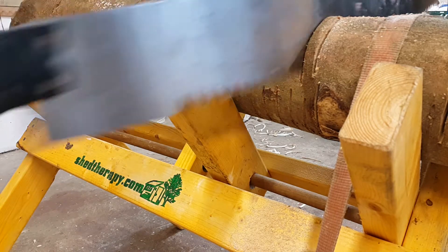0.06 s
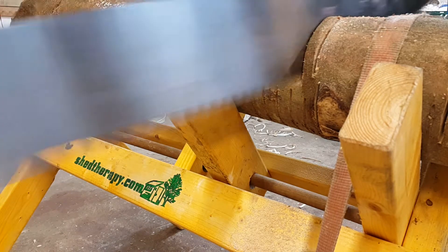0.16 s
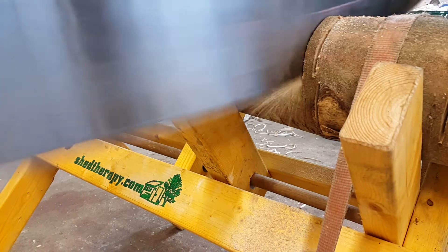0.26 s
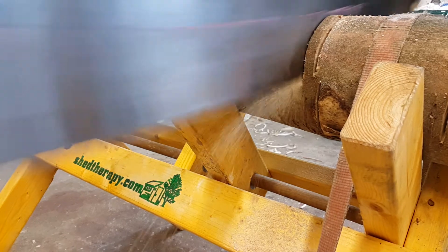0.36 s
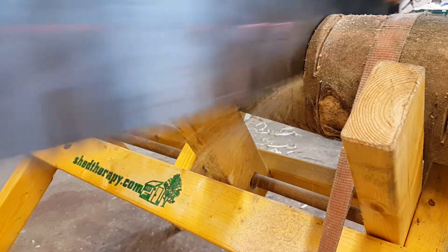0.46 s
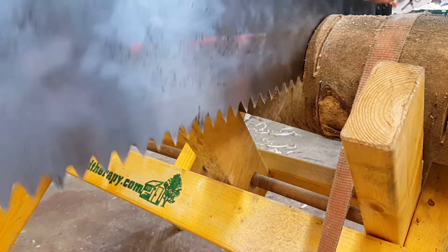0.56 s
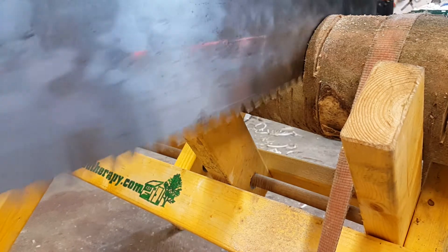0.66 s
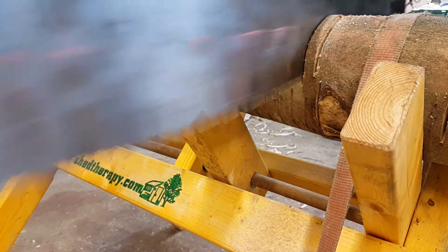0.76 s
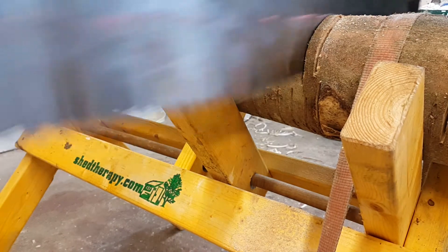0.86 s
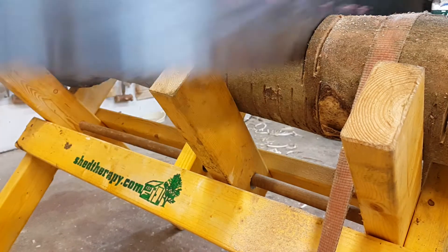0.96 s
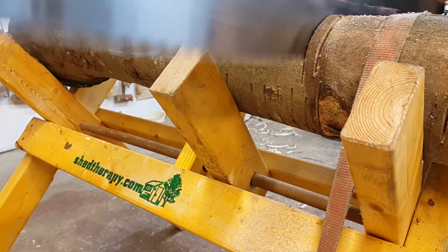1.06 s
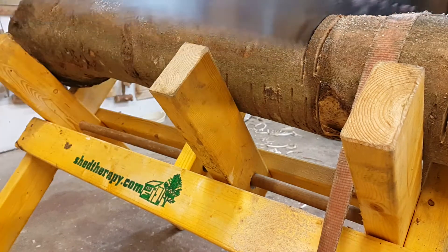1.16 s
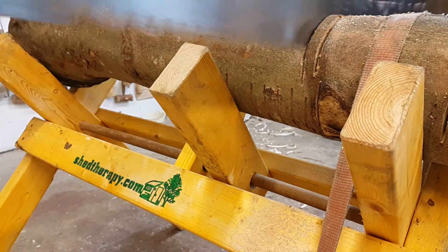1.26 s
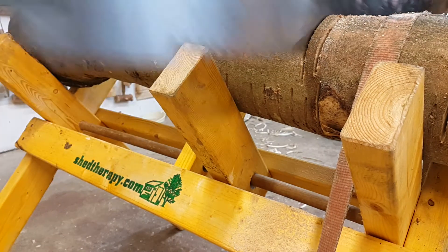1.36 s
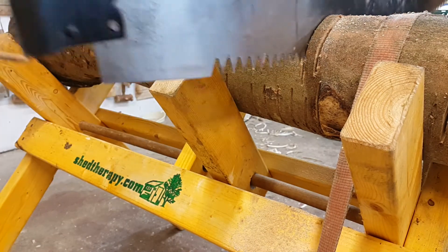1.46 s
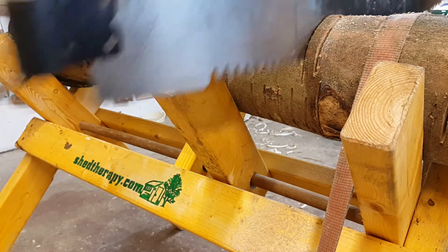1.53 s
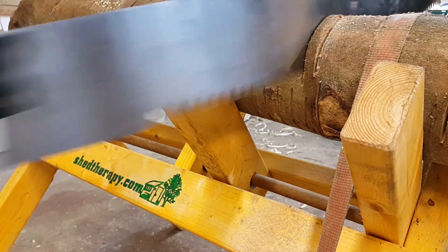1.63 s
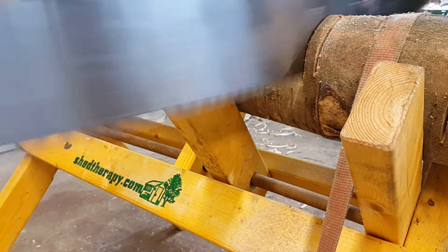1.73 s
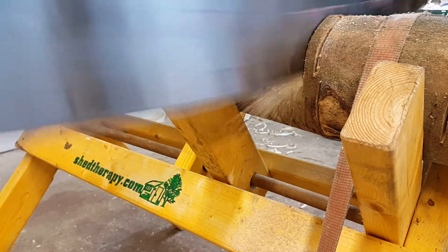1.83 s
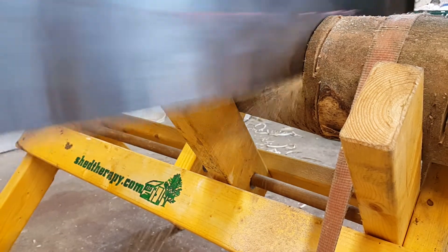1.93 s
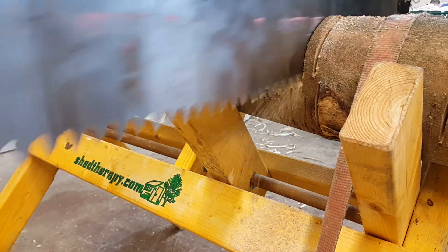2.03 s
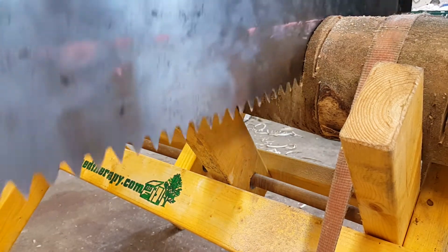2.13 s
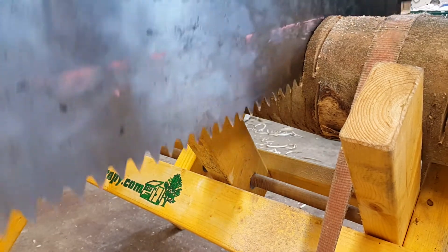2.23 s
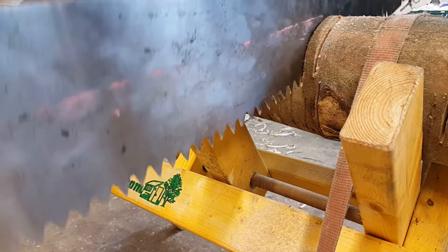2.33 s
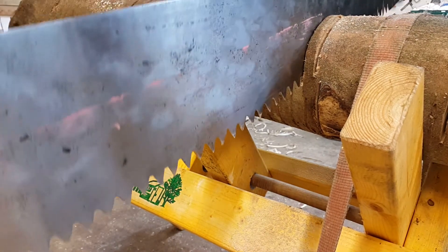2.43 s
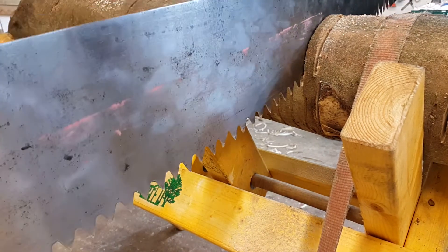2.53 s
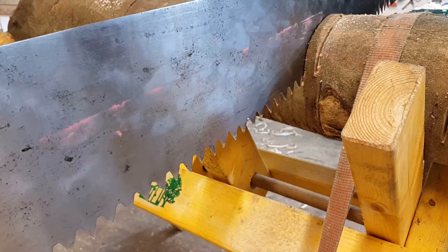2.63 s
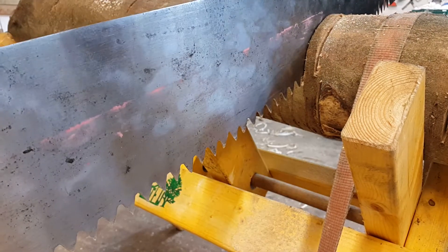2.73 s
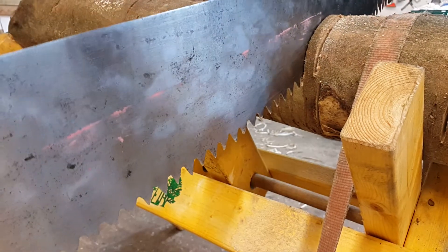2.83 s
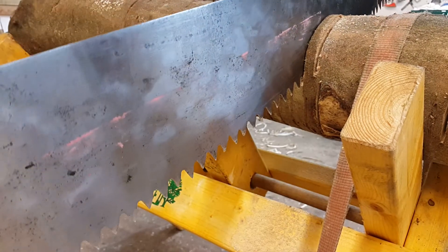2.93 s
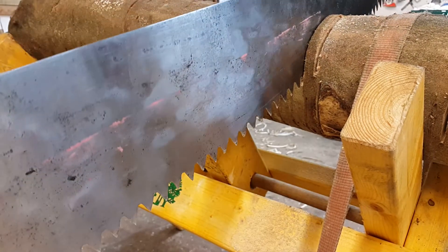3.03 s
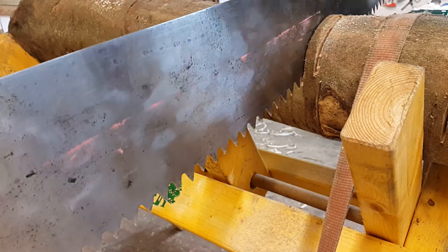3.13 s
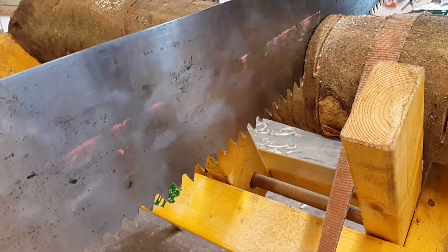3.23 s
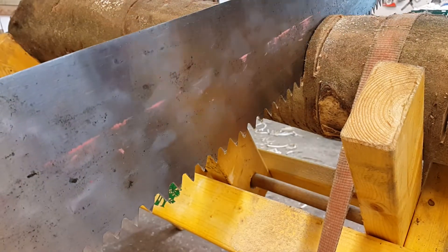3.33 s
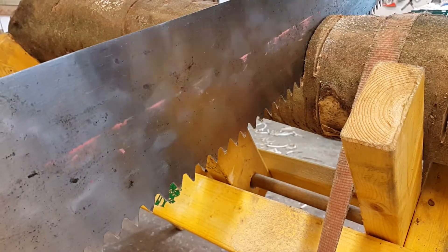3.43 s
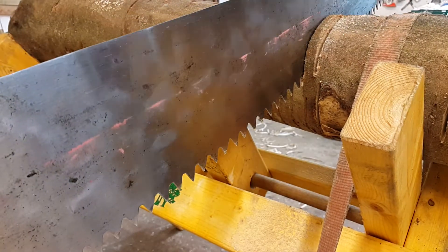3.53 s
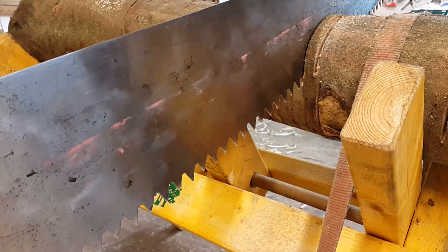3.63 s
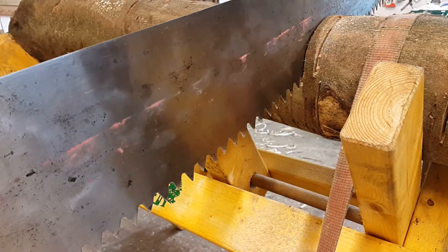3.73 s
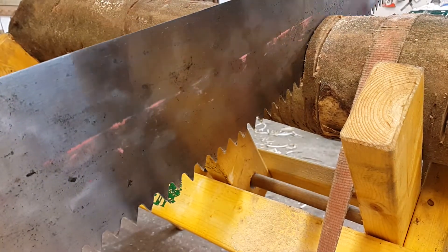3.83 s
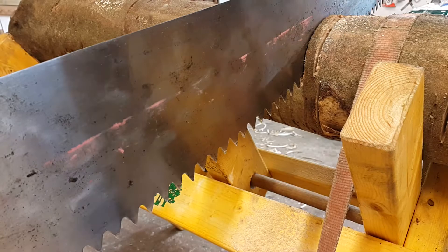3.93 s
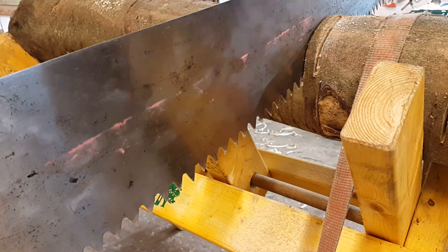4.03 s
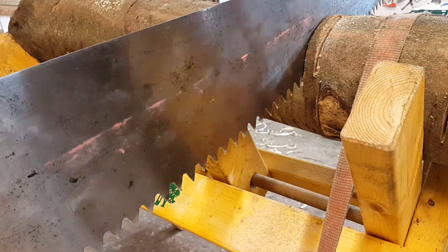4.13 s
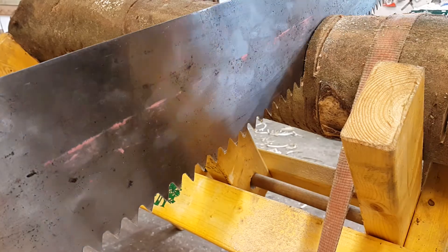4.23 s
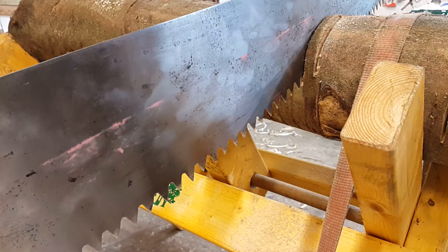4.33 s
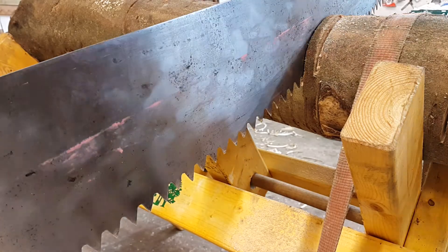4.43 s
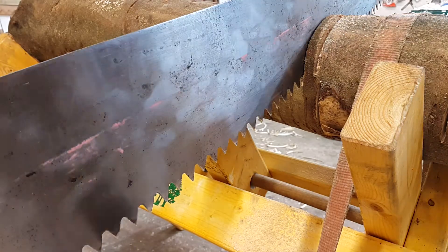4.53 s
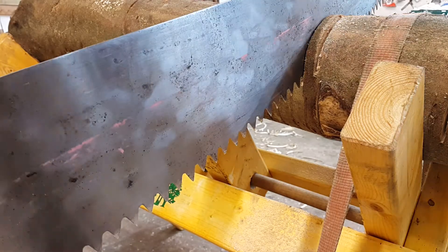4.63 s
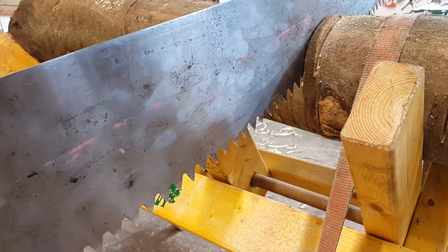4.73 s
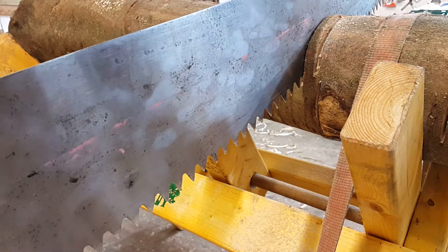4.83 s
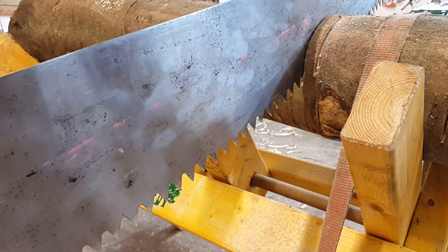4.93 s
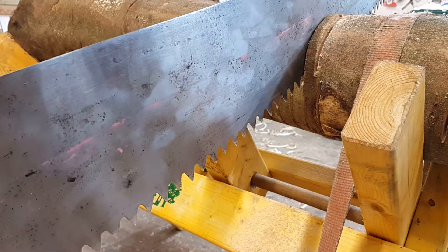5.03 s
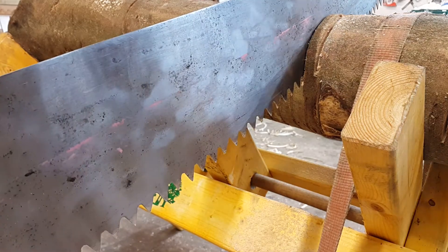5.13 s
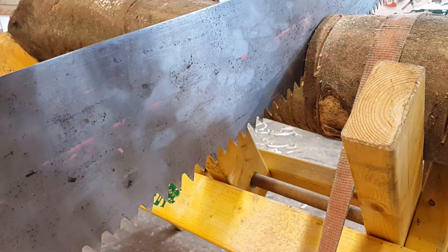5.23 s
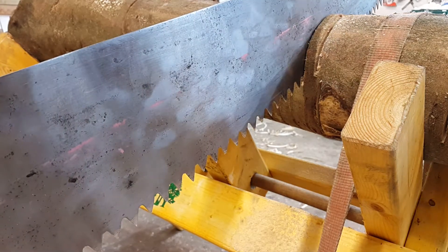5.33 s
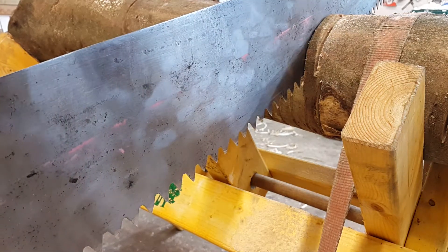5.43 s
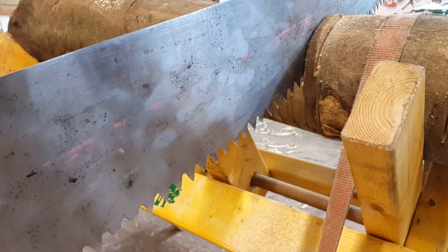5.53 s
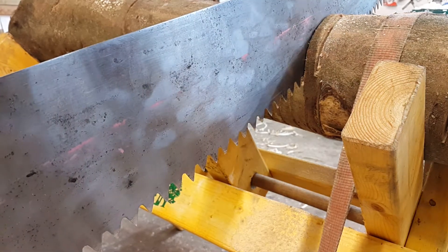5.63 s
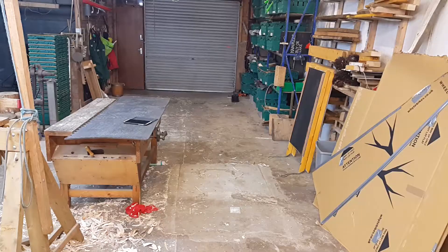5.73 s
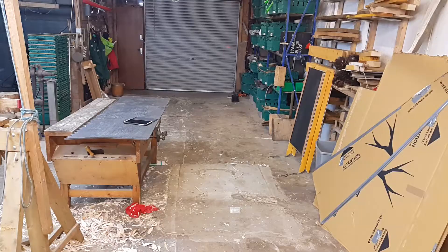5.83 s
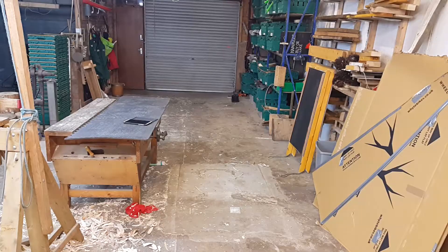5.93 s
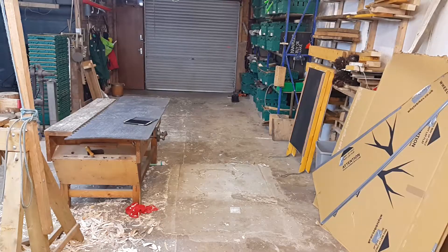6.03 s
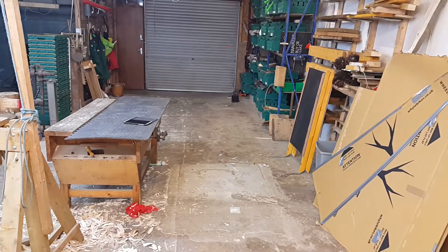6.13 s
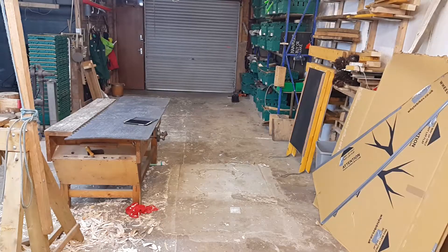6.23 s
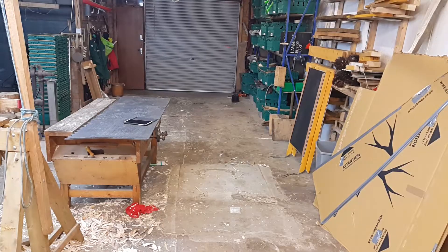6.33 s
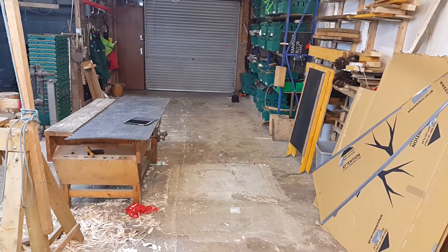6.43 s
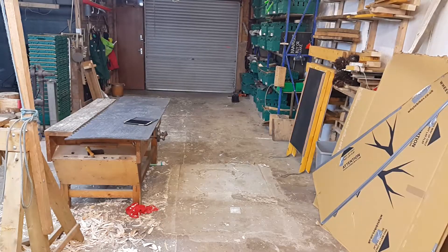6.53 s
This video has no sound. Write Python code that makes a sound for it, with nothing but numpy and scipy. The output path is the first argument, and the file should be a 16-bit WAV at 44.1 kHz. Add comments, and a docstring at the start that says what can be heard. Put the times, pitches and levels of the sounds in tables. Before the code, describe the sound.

Loud sawing opens abruptly in a reverberant workshop: the tail of a pull, a strong push, a rougher pull with stuttering skids, then a harder, faster push. The blade's hum dies away as cutting ends. A few sharp metallic clacks and tiny pings follow, with quieter footsteps and gritty scuffs behind. One small click, then only still air and faint hum. The saw is close to the microphone, the feet more distant.

```python
"""A coarse hand saw, close to the microphones, is pushed, drawn back and pushed again through a log on a
wooden sawhorse in a workshop. Random fibre fractures, timed by tooth and stroke, make the rasp and skids
and drive the ringing blade; the sawhorse knocks. Left in the cut, the saw ticks and pings as it settles.
Further off, the sawyer's heels thud and soles scuff on gritty concrete. One dry click sounds near the end;
behind it all lie still air, room echo and faint hums, some of which fall silent."""
import sys
import numpy as np
from scipy import signal
from scipy.fft import rfft, irfft
from scipy.io import wavfile

SR = 44100
rng = np.random.default_rng(int(sys.argv[2]) if len(sys.argv) > 2 else 0)


def bounce(signal):
    """Save signal as a 16-bit WAV file at the path given by the first command-line argument."""
    frames = np.transpose(np.atleast_2d(signal))
    limited = np.clip(frames, -1, 1)
    pcm = np.round(limited * 32767).astype(np.int16)
    wavfile.write(sys.argv[1], SR, pcm)


N = 290612
TIME = np.arange(N) / SR

# Still air of the workshop, relative spectrum: pitch_hz, level_db per Hz
AIR_SPECTRUM = [(15, -60), (25, -22.5), (101, -10), (169, -17.5), (193, -19), (552, -19.5), (598, -16),
                (666, -23.5), (15500, -37)]
AIR_DB = -67.0
# Steady mains hum: pitch_hz, level_db (rms)
MAINS_TONES = [(100, -77), (199.5, -80.5), (300, -84), (598, -91), (700, -85.5)]
# Lower hum beside the mains, until it falls silent: pitch_hz, level_db (rms)
LOW_HUM_TONES = [(92, -71), (145.3, -75)]
LOW_HUM_ENDS_S = 5.9
# Echo of the workshop: pitch_hz, t60_s
ROOM_DECAY = [(100, 0.94), (260, 0.61), (700, 0.59), (1840, 0.66), (4850, 0.5), (12800, 0.39)]
# Likeness of left and right in sound from all around: pitch_hz, correlation
ROOM_LIKENESS = [(60, 0.25), (150, .9), (300, 0.66), (640, 0.22), (1400, 0.086), (6000, 0.093)]
# Near sounds at the two microphone ports: pitch_hz, left_minus_right_db
PORT_COLOUR = [(300, 1), (1000, -1), (1800, -3), (4000, -1), (5400, -4.5), (6400, -11), (7300, -3),
               (8300, 6.5), (9500, 3), (15000, 1)]
SAW_LAG_S, TICK_LAG_S = .00008, 0.0003114   # later arrival at the left port
CUTOFF_HZ = 16000

# Small dry click, relative spectrum: pitch_hz, level_db per Hz
SNAP_SPECTRUM = [(100, 4.5), (550, -13), (780, 0.5), (1400, -7.5), (3300, -2.5), (3900, -14), (6500, -10),
                 (9000, -39)]
SNAP_S, SNAP_DB = 5.727, -28.5   # start, peak level

# Soles scuff on gritty concrete: loudest_s, level_db, rise_s, fall_s
SOLE_SCUFFS = [(2.524, -44.5, 0.037, 0.032), (3.215, -49.5, 0.026, .038), (3.294, -33, 0.01, 0.0053),
               (3.79, -34.5, .013, 0.0078), (4.358, -52.5, 0.029, 0.054), (4.912, -29, 0.027, .019),
               (5.58, -67.5, 0.038, 0.031)]
# Faint shifting of the feet: start_s, end_s, level_db
FOOT_SHUFFLES = [(2.5, 3.2, -67.5), (3.77, 4.9, -63.5)]
# Crunch of grit, relative spectrum: pitch_hz, level_db per Hz
GRIT_SPECTRUM = [(50, -28), (90, -18), (160, -0.5), (240, -9.5), (340, 1.5), (620, -0.5), (880, -5.5),
                 (1150, 0.5), (1650, -2.5), (2400, -8.5), (4600, -9), (6100, -10), (7700, -26),
                 (11000, -17), (16000, -23)]
# Heel strikes on concrete: start_s, level_db (peak)
HEEL_STRIKES = [(3.771, -25.5), (4.337, -31.5)]
# Modes of the heel thud: pitch_hz, level_db (relative), t60_s
HEEL_MODES = [(110, -29, 0.02), (255, -6.5, 0.019), (480, 4.5, 0.0024)]
TOE_S, TOE_DB = .027, -9   # the toe lands this much later and weaker
# after the heel the sole rolls over the grit: delay to the loudest moment, level, rise, fall
ROLL_S, ROLL_DB, ROLL_RISE_S, ROLL_FALL_S = .13, -54.5, 0.036, 0.11

# The sawhorse rocks on its legs: start_s, level_db
FRAME_KNOCKS = [(0.611, -42), (.797, -33), (1.091, -37.5), (1.277, -38), (1.532, -32), (1.74, -39),
                (2.49, -45.5)]
# Dull sound of the frame, relative spectrum: pitch_hz, level_db per Hz
FRAME_SPECTRUM = [(30, -29.5), (55, -4.5), (100, 0.5), (150, 0.5), (250, -1.5), (400, 2), (900, -33.5),
                  (3000, -61)]
KNOCK_T60_S = .22
JOLT_DB = -19.5   # jolt of the frame at a skid, relative to the skid's level
JUDDER_DB = -47   # judder of the frame at the fastest moment of the pull

# A tooth springs free and pings: start_s, level_db (near peak), pitch_hz, t60_s
TOOTH_PINGS = [(3.9915, -29, 6400, .008), (3.992, -37, 3450, .025), (4.009, -32, 3750, .035),
               (4.0095, -39, 3950, .03)]
# The blade slips in the cut: start_s, level_db (peak), centre_hz, spread_octaves, rebound_loss_db
BLADE_TICKS = [(2.515, -36, 5480, 0.36, 20), (2.752, -33.5, 6140, 0.47, 26), (3.169, -43, 5000, 1.54, 5),
               (3.207, -31.5, 5000, 1.5, 3), (3.228, -33, 5400, 1.7, 14), (3.283, -19, 4500, 1.2, 10),
               (3.2936, -17, 1700, 0.63, 23), (3.333, -9, 4820, 0.45, 14), (3.932, -35.5, 905, 1.1, 17),
               (3.9915, -30.5, 6900, .35, -4), (4.457, -27.5, 5700, .6, 23), (5.139, -41.5, 5480, 1.57, 22)]
# Stray slips in between: level_db (peak), centre_hz, spread_octaves, rebound_loss_db
STRAY_TICK = (-49, 5500, 10, 19.5)
# Span in which stray slips fall: start_s, end_s
SETTLING_SPAN = (2.5, 5.7)
# Tooth of steel against wood, relative spectrum: pitch_hz, level_db per Hz
TOOTH_SPECTRUM = [(100, 6.5), (450, 8), (1400, 5.5), (3000, 2), (5000, 2), (6200, 1.5), (7600, -15.5),
                  (10500, -4.5), (16000, -13)]
REBOUND_S = .0076   # a slip rebounds twice, this far apart

# The free end of the blade is set swinging: start_s, level_db, t60_s, damped_from_s
BLADE_SWINGS = [(.45, -32.5, 2.0, .86), (.86, -35, 1.3, 1.16), (2.06, -27.5, 1.7, 2.485)]
SWING_HZ = 418

# Strokes of the saw: start_s, fastest_s, end_s, top_speed_teeth_per_s (push positive),
# rasp_db of the log, hiss_db of the teeth (both gains ahead of the saw's mix), ease_off_s of the hand
SAW_STROKES = [(-.3, -.05, .125, -60, -30, -21, 0.13), (0.124, .475, .74, 169, -23, -15.5, 0.2),
               (.76, 1.119, 1.655, -132, -25, -19.5, .28), (1.655, 2.025, 2.225, 174.5, -21.5, -14, 0.22)]
# Rasp on the push, relative spectrum: pitch_hz, level_db per Hz
PUSH_SPECTRUM = [(88, -40.5), (150, -25), (366, -11), (420, -4.5), (607, -2.5), (722, 2.5), (1420, -6.5),
                 (1730, -5), (1910, -7.5), (2310, -4.5), (3550, -8.5), (5990, -4), (7560, -14.5),
                 (15500, -20)]
# Rasp on the pull, relative spectrum: pitch_hz, level_db per Hz
PULL_SPECTRUM = [(88, -45.5), (150, -17.5), (308, -16), (381, -9), (420, 0.5), (540, -5), (781, 2.5),
                 (844, -2), (1150, -9.5), (1450, -12.5), (2180, -7.5), (4310, -9), (6110, -5), (7560, -15),
                 (15500, -19.5)]
# Rasp when pulling near the tip, relative spectrum: pitch_hz, level_db per Hz
TIP_SPECTRUM = [(88, -44), (150, -18), (373, -11.5), (509, -0.5), (1000, -4), (1090, 4), (1340, -13),
                (2060, -9), (2450, -9.5), (2810, -12), (5440, -8.5), (6470, -10.5), (7710, -26),
                (10900, -21), (15500, -27)]
# Ringing of the steel blade: pitch_hz, level_db (relative), t60_s
BLADE_MODES = [(511, -8, .5), (576, 0, .85), (720, -5, .6), (782, -8, .4), (1065, -9, .4),
               (1116, -11, 1.25), (1797, -10, .4), (2145, -11, .9), (3242, -14, .4), (5646, -12, .4)]
# Bursts of skidding teeth, most after a bind; the first is only the sudden start of the sound:
# start_s, level_db (ahead of the saw's mix), t60_s, hushed_before_s (the cut dies away this long before)
SKID_BURSTS = [(.006, -27, 0.044, 0.0087), (0.141, -24.5, 0.12, 0.018), (0.816, -32, 0.038, 0.017),
               (1.17, -13.5, 0.063, 0.078), (1.337, -17, 0.17, 0.065), (1.67, -31.5, 0.17, 0)]
# Skid of the teeth, relative spectrum: pitch_hz, level_db per Hz
SKID_SPECTRUM = [(240, -32), (400, 0.5), (879, -5), (2020, -22.5), (2470, -1), (3930, -14), (6240, 2),
                 (8630, -8), (11200, -11.5), (16000, -16.5)]
# speed follows a half sine to this power: the push is peaked, the pull even
PUSH_SHAPE, PULL_SHAPE = 1.1576, 0.54883
RASP_GROWTH, HISS_GROWTH = 0.87, 0.95   # loudness follows speed to these powers
HISS_EASE_DB, RASP_EASE_DB = 27, 7.5   # lost as the hand eases off
PUSH_LEAN_DB = 6.5   # the hand bears down: the rasp gains this much from start to end of a push
HUSH_T60_S = 0.034   # the cut dies this fast ahead of a skid
CREEP_TEETH_PER_S = 8   # the slowest rate at which teeth still catch


def from_db(db):
    """Level in dB to amplitude."""
    return 10 ** (np.asarray(db) / 20)


def rms_one(x):
    """Scale to an rms of one."""
    return x / np.sqrt(np.mean(x ** 2) + 1e-20)


def at_hz(points, hz):
    """Read a table between its points, along log frequency."""
    points = np.array(points)
    return np.interp(np.log(hz + 1e-3), np.log(points[:, 0]), points[:, 1])


def convolve(x, response):
    """Filter each channel by a response, cut to the scene's length."""
    return signal.fftconvolve(np.atleast_2d(x), np.atleast_2d(response), axes=-1)[:, :N]


def colour(x, spectrum, size=4096):
    """Causal (minimum-phase) filter with the given spectrum."""
    gain = from_db(at_hz(spectrum, np.fft.rfftfreq(size, 1 / SR)))
    cepstrum = irfft(np.log(gain))
    # fold the cepstrum onto positive time: nothing sounds before its cause
    cepstrum[1:size // 2] *= 2
    cepstrum[size // 2 + 1:] = 0
    return convolve(x, irfft(np.exp(rfft(cepstrum))))


def drift(rate):
    """Random wander about zero: normal draws, rate per second, joined by straight lines."""
    return np.interp(TIME * rate, np.arange(4096), rng.standard_normal(4096))


def dying(t, t60):
    """Exponential decay from t = 0, by 60 dB in t60 seconds."""
    return (t >= 0) * np.exp(-np.log(1000) * np.abs(t) / t60)


def ring(hz, t60, size=4096):
    """A struck mode: a sine that dies away."""
    t = TIME[:size]
    return dying(t, t60) * np.sin(2 * np.pi * hz * t)


def add(track, s, sound):
    """Lay a sound into a track from s seconds on."""
    start = int(s * SR)
    track[start:start + len(sound)] += sound[:N - start]


def grains(per_s, spread_db):
    """Tiny fractures of uneven size and either sign at random moments."""
    sizes = from_db(spread_db * np.minimum(rng.exponential(1, N), 4))
    signed = sizes * rng.choice([-1, 1], N)
    return rms_one(signed * (rng.random(N) < per_s / SR))


def bursts(rows):
    """Envelope of sudden onsets that die away."""
    return sum(from_db(db) * dying(TIME - s, t60) for s, db, t60, *_ in rows)


def diffuse(size):
    """Stereo noise from all around, as alike left and right as the likeness table says."""
    mid, side = rfft(rng.standard_normal((2, size)))
    alike = np.clip(at_hz(ROOM_LIKENESS, np.fft.rfftfreq(size, 1 / SR)), -1, 1)
    return irfft(np.sqrt(1 + alike) * mid + np.sqrt(1 - alike) * side * [[1], [-1]], size)


def at_ports(x, share, lag_s):
    """A sound reaches the left port later, and each port colours it in its own way."""
    hz, db = np.transpose(PORT_COLOUR)
    left = colour(x[0], np.c_[hz, share * db / 2])[0]
    right = colour(x[-1], np.c_[hz, -share * db / 2])[0]
    at = np.arange(len(left))
    return np.array([np.interp(at - lag_s * SR, at, left), right])


def workshop(size=49152, count=8):
    """Echo of the room, of unit energy ahead of the ports: it builds up, then each band dies at its own pace."""
    noise = rfft(diffuse(size))
    hz, t = np.fft.rfftfreq(size, 1 / SR), TIME[:size]
    centres = np.geomspace(100, 14000, count)
    tail = 0
    for centre, band in zip(centres, np.eye(count)):
        band_noise = irfft(noise * at_hz(np.c_[centres, band], hz))
        tail = tail + band_noise * dying(t, at_hz(ROOM_DECAY, centre))
    build_up = 1 - np.exp(-t / .003)
    tail = rms_one(tail * build_up) / np.sqrt(size)
    return at_ports(tail, share=.65, lag_s=0)


def hum(lines):
    """Steady tones that waver a little in level and phase."""
    tones = 0
    for hz, db in lines:
        level = from_db(db + 0.5 * drift(9)) * np.sqrt(2)
        tones = tones + level * np.sin(2 * np.pi * hz * TIME + 0.27 * drift(1.3))
    return tones


def background():
    """Still air as diffuse noise; a lower hum sounds beside the mains hum, then falls silent."""
    sounding = np.clip((LOW_HUM_ENDS_S - TIME) / 0.086, 0, 1)
    air = from_db(AIR_DB) * rms_one(colour(diffuse(N), AIR_SPECTRUM))
    return hum(MAINS_TONES) + sounding * hum(LOW_HUM_TONES) + air


def snap():
    """A lone dry click: one coloured impulse."""
    click = colour(signal.unit_impulse(N, int(SNAP_S * SR)), SNAP_SPECTRUM)
    return from_db(SNAP_DB) * click / np.abs(click).max()


def soles():
    """Grit crunches under a sole that slides, rolls after a heel strike or just shifts."""
    rolls = [(s + ROLL_S, ROLL_DB, ROLL_RISE_S, ROLL_FALL_S) for s, _ in HEEL_STRIKES]
    slide = 0
    for s, db, rise_s, fall_s in list(SOLE_SCUFFS) + rolls:
        width_s = np.where(TIME < s, rise_s, fall_s)
        slide = slide + from_db(db) * np.exp(-.5 * ((TIME - s) / width_s) ** 2)
    shifting = sum(from_db(db) * ((TIME > start) & (TIME < end)) for start, end, db in FOOT_SHUFFLES)
    shuffle = from_db(2.44 * drift(9)) * shifting
    crunch = rms_one(colour(grains(5000, spread_db=-1.5), GRIT_SPECTRUM))
    return np.hypot(slide, shuffle) * crunch


def heels(low_hz=90):
    """A heel lands on concrete with a short thud of a few modes, and the toe follows."""
    out = np.zeros(N)
    thud = sum(from_db(db) * ring(hz, t60) for hz, db, t60 in HEEL_MODES)
    thud = signal.sosfilt(signal.butter(2, low_hz, "high", fs=SR, output="sos"), thud)
    thud = -thud / np.abs(thud).max()
    for s, db in HEEL_STRIKES:
        add(out, s, from_db(db) * thud)
        add(out, s + TOE_S, from_db(db + TOE_DB) * thud)
    return out[None]


def sawhorse():
    """The loose frame judders dully on the pull, at each skid and when it rocks."""
    pull = np.maximum(-strokes()[0], 0)
    knocks = bursts([(s, db, KNOCK_T60_S) for s, db in FRAME_KNOCKS])
    jolts = knocks + from_db(JOLT_DB) * bursts(SKID_BURSTS)
    judder = from_db(JUDDER_DB) * pull / pull.max()
    rattle = rms_one(colour(grains(650, spread_db=4.5), FRAME_SPECTRUM))
    return np.hypot(jolts, judder) * rattle


def pings():
    """Short clear rings of a single tooth, each a decaying sine."""
    out = np.zeros(N)
    for s, db, hz, t60 in TOOTH_PINGS:
        add(out, s, from_db(db) * ring(hz, t60))
    return out


def ticks(crack_db=-15, crack_t60=0.018, size=2048, count=5):
    """A tooth slips in the cut and rebounds; each slip rings in a range of its own."""
    out, hz = np.zeros(N), np.geomspace(100, 16000, 200)
    strays = [(s, *STRAY_TICK) for s in rng.uniform(*SETTLING_SPAN, count)]
    for s, db, centre_hz, spread, loss_db in list(BLADE_TICKS) + strays:
        resonance_db = -10 * np.log10(1 + (np.log2(hz / centre_hz) / spread) ** 2)
        spectrum = np.c_[hz, at_hz(TOOTH_SPECTRUM, hz) + resonance_db]
        for k, touch_db in enumerate([db, db - loss_db, db - loss_db]):
            crack = from_db(crack_db) * rng.standard_normal(size) * dying(TIME[:size], crack_t60)
            crack[0] = 1   # the slip itself, then a short crackle of fibres
            tick = colour(crack, spectrum)[0]
            add(out, s + k * REBOUND_S, from_db(touch_db) * tick / np.abs(tick).max())
    return out[None]


def strokes():
    """Each stroke speeds up and slows; rasp and hiss follow. Gives teeth per s and the two gains."""
    travel = force = sharpness = 0
    for start, fastest, end, teeth_per_s, rasp_db, hiss_db, ease_s in SAW_STROKES:
        pushing = teeth_per_s > 0
        phase = np.interp(TIME, [start, fastest, end], [-.5, 0, .5])
        speed = np.sin(np.pi * (.5 - np.abs(phase))) ** (PUSH_SHAPE if pushing else PULL_SHAPE)
        easing = np.clip(1 - (end - TIME) / ease_s, 0, 1)
        stroke_rasp_db = rasp_db + PUSH_LEAN_DB * phase * pushing - RASP_EASE_DB * easing
        stroke_hiss_db = hiss_db - HISS_EASE_DB * easing
        travel = travel + teeth_per_s * speed
        force = force + from_db(stroke_rasp_db) * speed ** RASP_GROWTH
        sharpness = sharpness + from_db(stroke_hiss_db) * speed ** HISS_GROWTH
    return travel, force, sharpness


def blade_position():
    """How far the blade is pushed through the log, 0-1: the running sum of its speed."""
    pushed = np.cumsum(strokes()[0])
    return (pushed - pushed.min()) / np.ptp(pushed)


def cutting():
    """Gain of the cut: 1, but dying away briefly ahead of most skids, as when teeth bind."""
    gain = np.ones(N)
    for s, _, _, hushed_s in SKID_BURSTS:
        if hushed_s > 0:
            hush = dying(np.maximum(TIME - s + hushed_s, 0), HUSH_T60_S)
            gain = gain * np.where(TIME < s, hush, 1)
    return gain


def moving_echo(x, count=6, stroke_s=.0016):
    """As the blade slides, paths to some walls grow and to others shrink, so the echo keeps shifting."""
    shift = stroke_s * blade_position()
    paths = [np.interp(TIME - shift * toward, TIME, x[0]) for toward in np.linspace(-1, 1, count)]
    return sum(convolve(path, workshop()) for path in paths) / np.sqrt(count)


def blade_swing(build_s=0.037, damped_t60=0.32):
    """The free end hums on its lowest mode until the cut or the hand damps it."""
    level = 0
    for s, db, t60, damped_s in BLADE_SWINGS:
        build_up = np.clip((TIME - s) / build_s, 0, 1)
        damping = dying(np.maximum(TIME - damped_s, 0), damped_t60)
        level = level + from_db(db) * dying(TIME - s, t60) * build_up * damping
    unrest = np.abs(strokes()[0]) / 100   # passing teeth jostle it
    tone = np.sin(2 * np.pi * SWING_HZ * TIME + 0.53 * unrest * drift(25))
    return level * from_db(2 * unrest * drift(26)) * tone


def saw(split_hz=1400, wood_db=-7.0, hiss_db=-2.5, blade_db=-17.5, skid_db=0.5, tip_db=1.0, uneven_db=1.0):
    """Each tooth bites and tears a spray of fibres; the log rasps and the blade rings on."""
    travel, force, sharpness = strokes()
    position = blade_position()

    # each tooth bites hardest as it arrives, then slackens
    teeth_per_s = np.maximum(np.abs(travel), CREEP_TEETH_PER_S) * from_db(1.52 * drift(69.69))
    tooth_phase = np.cumsum(teeth_per_s) / SR % 1
    bite = from_db(-15 * tooth_phase + 2.0 * drift(70))
    tearing = grains(12000, spread_db=2.2) * bite
    tearing = tearing * from_db(1.3 * drift(35))   # hard and soft rings of the log

    # waves return from the end of the blade, so resonances glide as its free length changes
    round_trip_s = .0009 + .0016 * position
    tearing = rms_one(tearing + .3 * np.interp(TIME - round_trip_s, TIME, tearing))

    # the rasp changes colour with direction and near the tip
    pushing = np.clip(.5 + travel / 60, 0, 1)
    near_tip = np.clip((.42 - position) / 0.04, 0, 1)
    rasp = (pushing * rms_one(colour(tearing, PUSH_SPECTRUM))
            + (1 - pushing) * (1 - near_tip) * rms_one(colour(tearing, PULL_SPECTRUM))
            + (1 - pushing) * near_tip * rms_one(colour(tearing, TIP_SPECTRUM)))
    low_pass = signal.butter(4, split_hz, "low", fs=SR, output="sos")
    high_pass = signal.butter(4, split_hz, "high", fs=SR, output="sos")
    wood = rms_one(signal.sosfilt(low_pass, rasp))
    hiss = rms_one(signal.sosfilt(high_pass, rasp))

    grip = cutting() * from_db(uneven_db * drift(30))   # the hand presses unevenly
    force = grip * force * from_db(tip_db * near_tip)
    sharpness = grip * sharpness

    steel = sum(from_db(db) * rms_one(ring(hz, t60, size=65536)) for hz, db, t60 in BLADE_MODES)
    blade = convolve(tearing * force, rms_one(steel) / np.sqrt(len(steel)))
    skids = bursts(SKID_BURSTS) * rms_one(colour(tearing, SKID_SPECTRUM))
    cut = from_db(wood_db) * force * wood + from_db(hiss_db) * sharpness * hiss
    return cut + from_db(blade_db) * blade + from_db(skid_db) * skids


def scene():
    """The saw is close to the microphone, the feet are further off; both sound in the room."""
    frame, steps, scuffs = sawhorse(), heels(), soles()
    ticking, sawing = ticks() + pings(), saw()
    tick_gain = from_db([[1.0], [4.5]])   # left, right
    near_saw = at_ports(sawing, share=1.0, lag_s=SAW_LAG_S)
    near_ticks = at_ports(ticking, share=1.0, lag_s=TICK_LAG_S) * tick_gain
    feet = steps + at_ports(scuffs, share=1.0, lag_s=TICK_LAG_S)
    to_room = from_db(-7.5) * frame + from_db(-2.0) * ticking + from_db(-2) * steps + from_db(-4.0) * scuffs
    echo = from_db(1.5) * moving_echo(sawing) + convolve(to_room, workshop())
    return background() + snap() + feet + frame + echo + near_ticks + blade_swing() + near_saw


def record(dry):
    """The deepest rumble is cut, the highest peaks are rounded, the top is cut."""
    x = signal.sosfilt(signal.butter(3, 45, "high", fs=SR, output="sos"), dry)
    x = x / (1 + x ** 6) ** (1 / 6)
    return signal.sosfilt(signal.ellip(12, .1, 80, CUTOFF_HZ, fs=SR, output="sos"), x)


dry = scene()
out = record(dry)
bounce(out)
```